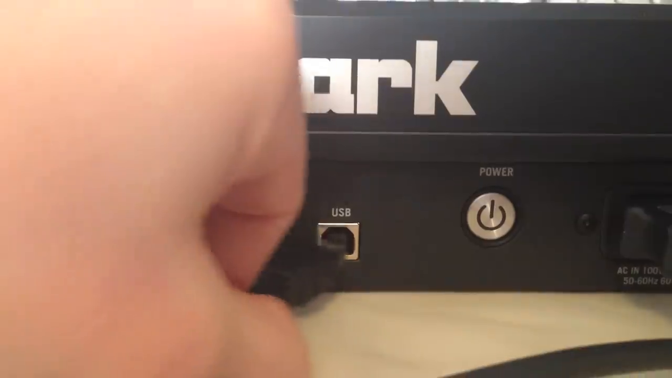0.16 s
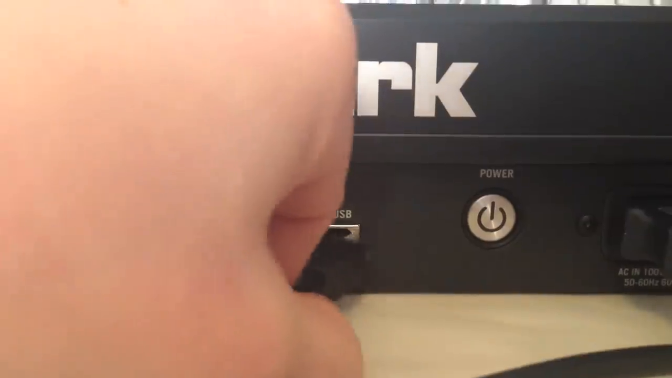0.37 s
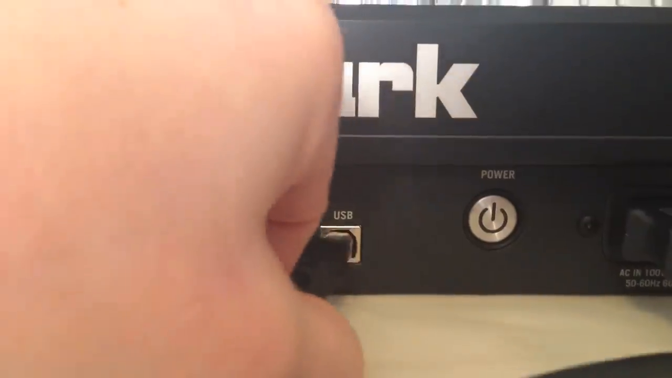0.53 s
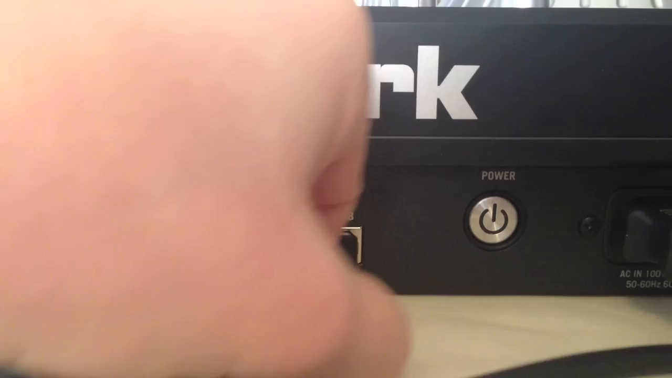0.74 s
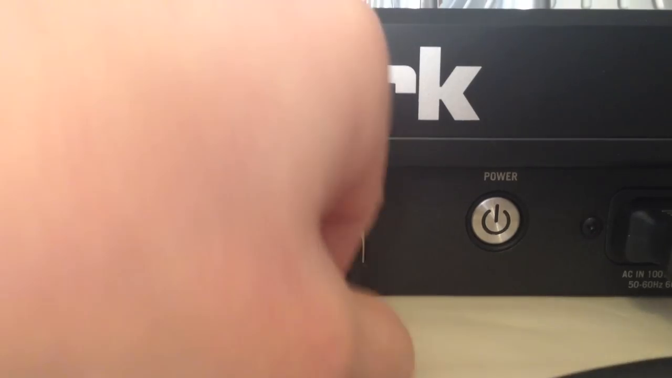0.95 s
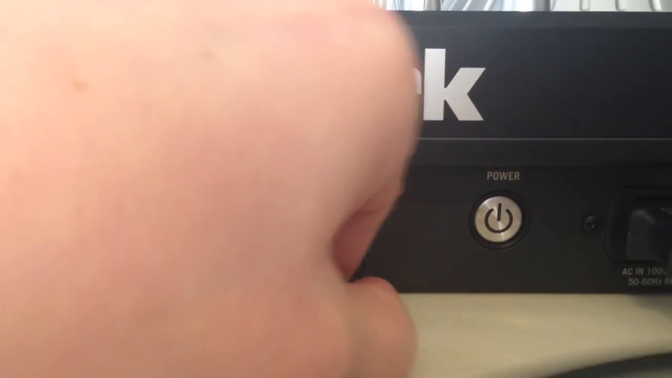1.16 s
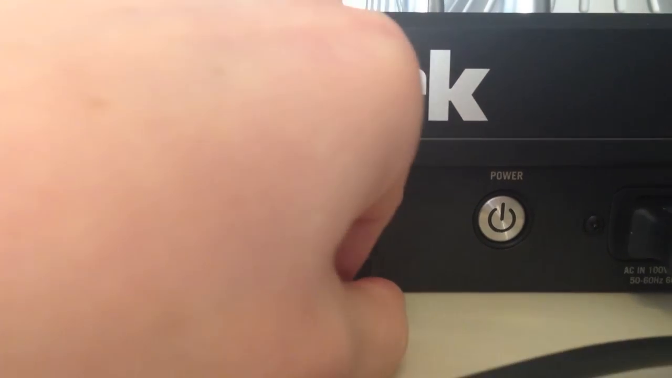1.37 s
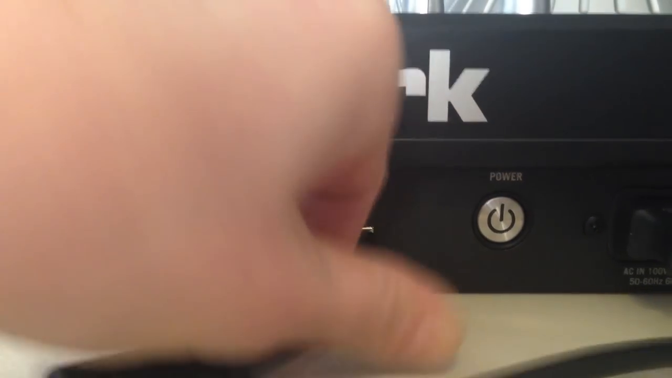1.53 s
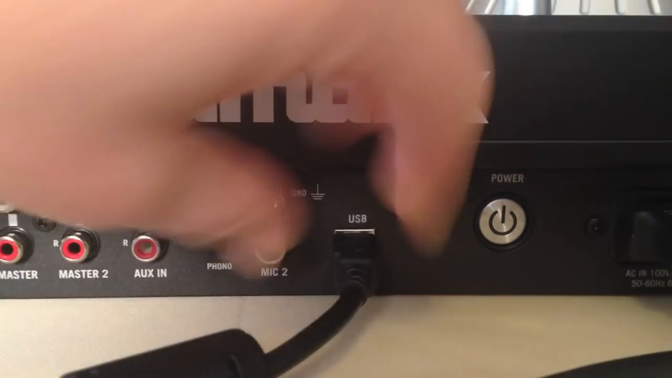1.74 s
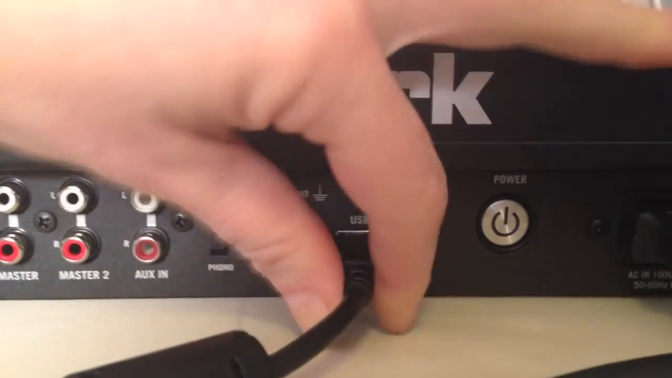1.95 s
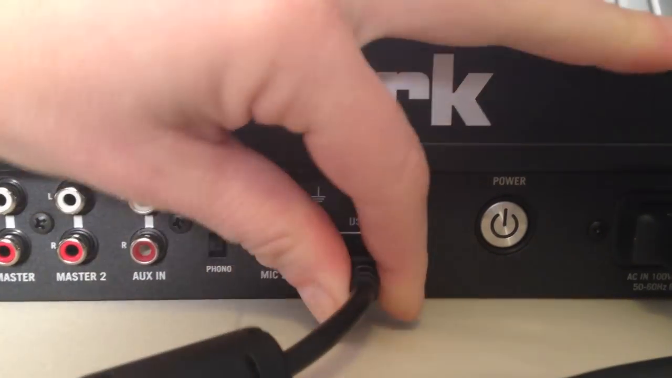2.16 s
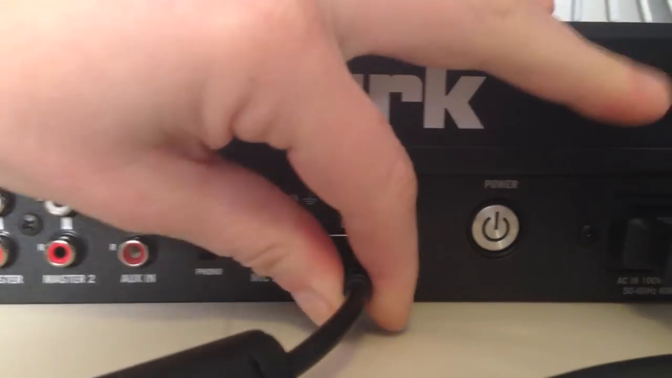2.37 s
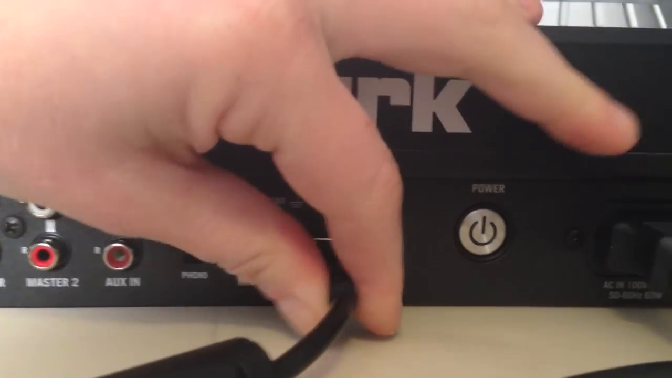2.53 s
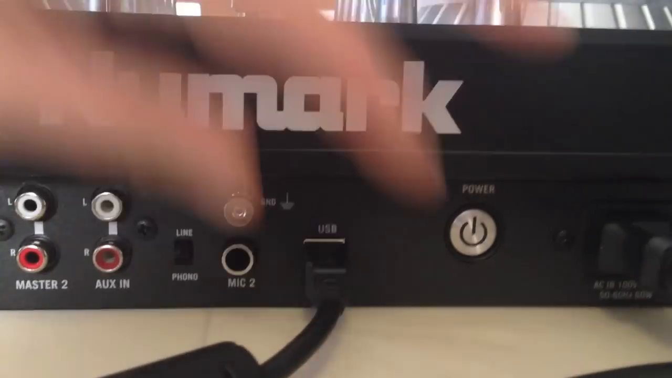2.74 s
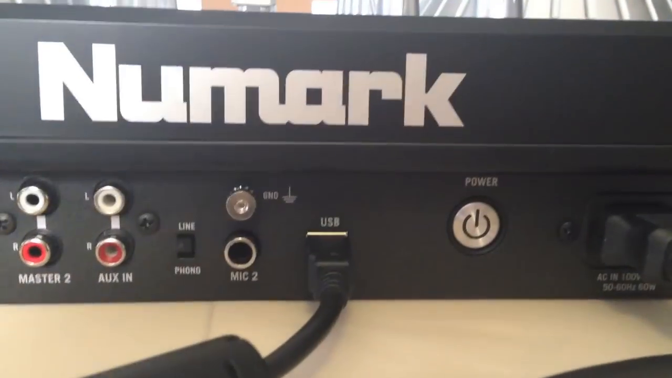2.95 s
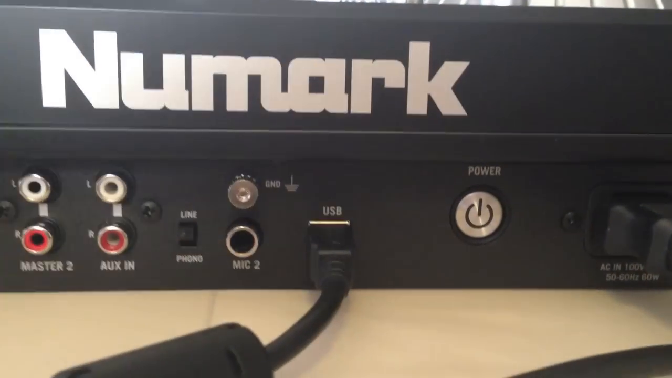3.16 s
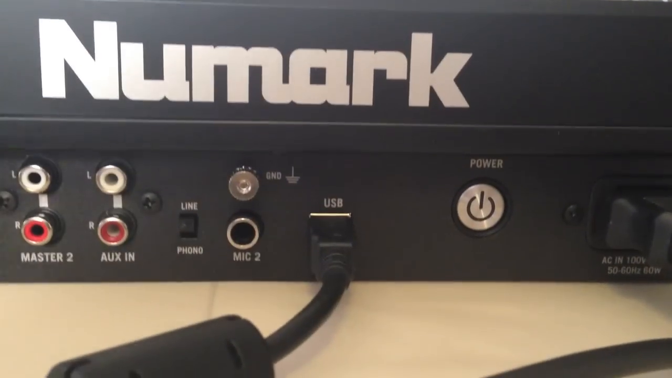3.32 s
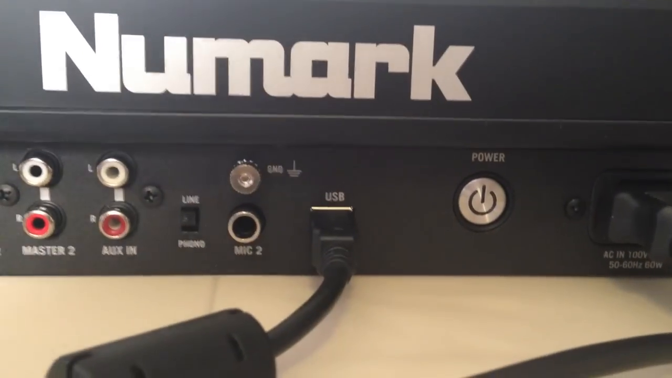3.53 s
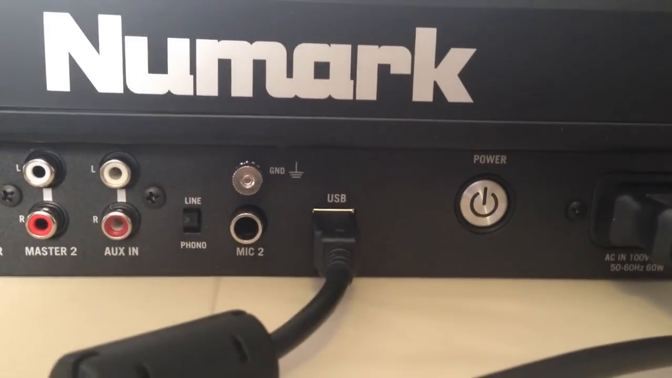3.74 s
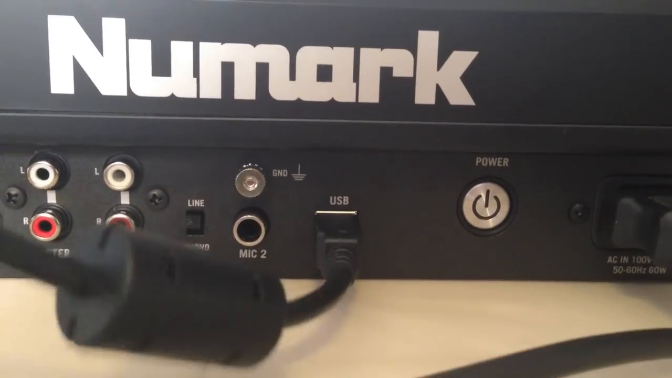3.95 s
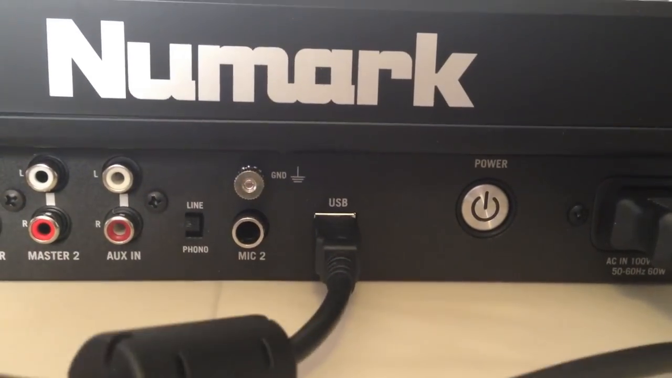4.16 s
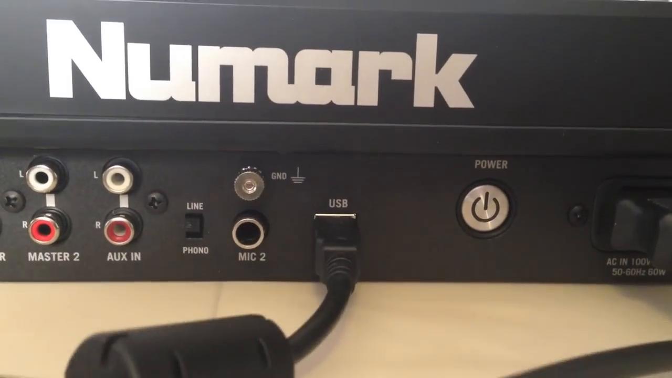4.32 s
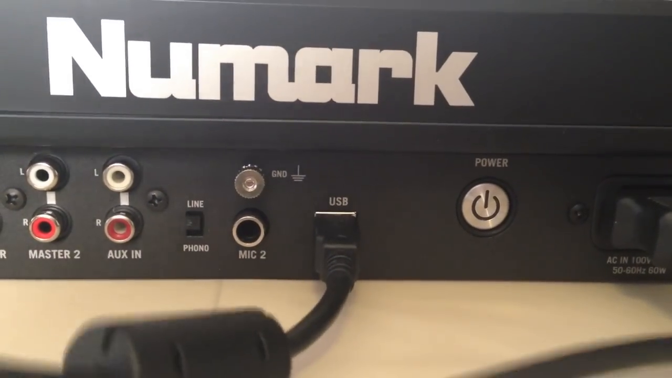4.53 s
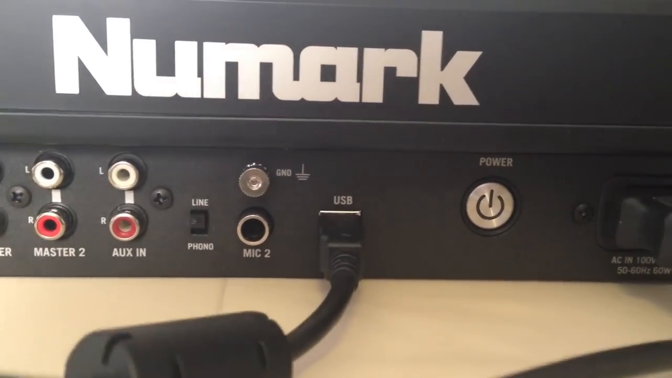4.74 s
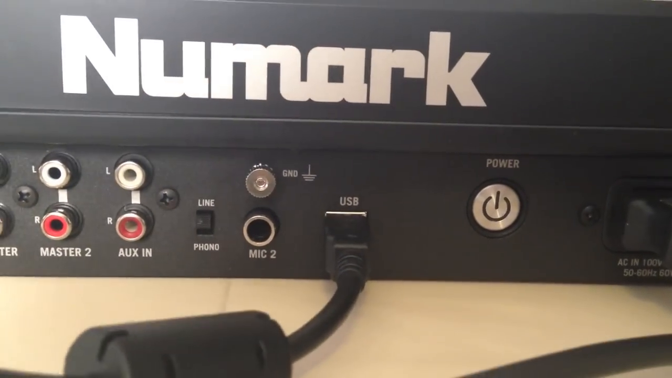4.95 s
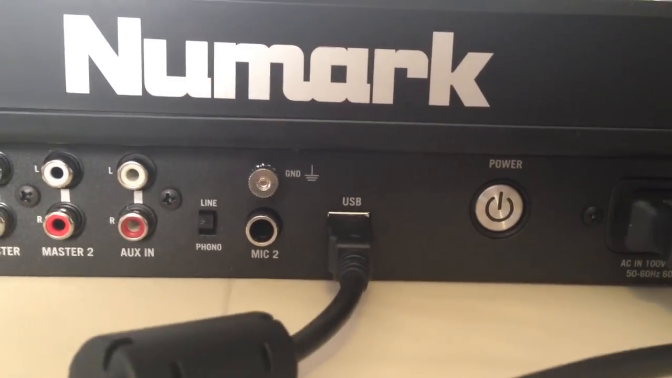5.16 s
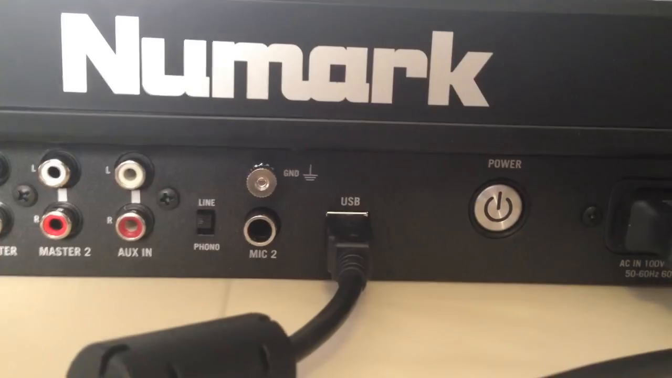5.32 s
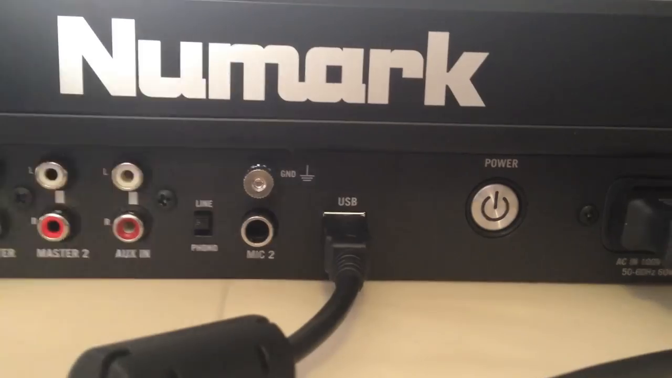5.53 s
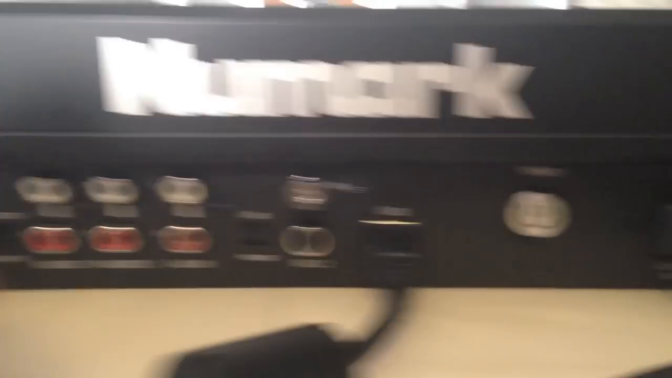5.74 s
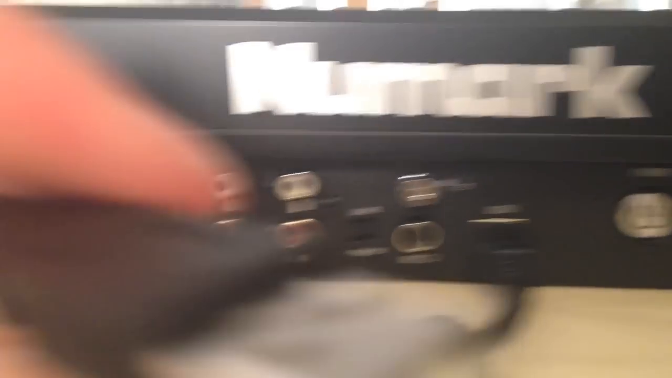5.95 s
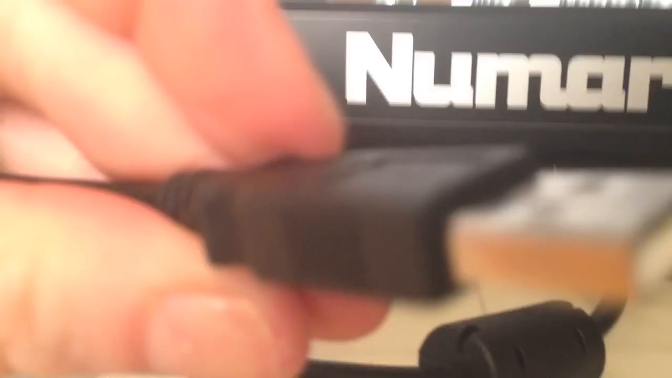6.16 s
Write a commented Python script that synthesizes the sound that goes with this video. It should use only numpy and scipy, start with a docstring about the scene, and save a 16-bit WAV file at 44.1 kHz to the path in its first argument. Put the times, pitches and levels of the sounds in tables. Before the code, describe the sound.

A plastic and metal plug is fumbled against a socket, knocks in, snaps home with a second push, then its cable is set down.

```python
"""In a small quiet room a USB plug is fumbled against its socket on the back of a desktop mixer.
It slides in and seats with a knock; a second push snaps it home, and the cable is dragged and set down.
Force pulses and friction noise excite resonant modes of case and plug, heard from close by.
Squeaks ring single modes; diffuse echoes and a steady room tone surround the contacts."""
import sys
import numpy as np
from scipy import signal
from scipy.fft import rfft, irfft, next_fast_len
from scipy.io import wavfile

SR = 44100
rng = np.random.default_rng(int(sys.argv[2]) if len(sys.argv) > 2 else 0)


def log_audio(samples):
    """Write samples as a 16-bit WAV file to the path given in sys.argv[1]."""
    # one column per channel
    frames = np.atleast_2d(samples).T
    # limit to full scale, then quantise
    limited = np.clip(frames, -1, 1)
    pcm = np.round(limited * 32767).astype(np.int16)
    wavfile.write(sys.argv[1], SR, pcm)


N = 277290

SQUARE_HIT_SCUFF = 0.13   # share of skidding (0-1) in thuds, knock and snap, which hit squarely


def from_db(db):
    """Level definition: an amplitude gain is 10 to the power of dB / 20."""
    return 10 ** (np.asarray(db) / 20)


def at_hz(hz, known_hz, values):
    """Logarithmic frequency scale: read a spectrum between its known points."""
    return np.interp(np.log(np.maximum(hz, 1)), np.log(known_hz), values)


def coloured(x, known_hz, db):
    """Linear filtering: multiply the spectrum of a noise by a smooth gain curve."""
    size = next_fast_len(len(x))
    hz = np.fft.rfftfreq(size, 1 / SR)
    gain = from_db(at_hz(hz, known_hz, db))
    return irfft(rfft(x, size) * gain, size)[:len(x)]


def tilted(db, known_hz, pivot_hz, brightness):
    """Contact stiffness: harder surfaces tip a spectrum to the treble, in dB per octave about a pivot."""
    octaves = np.log2(np.asarray(known_hz) / pivot_hz)
    return np.asarray(db) + brightness * octaves


def add(track, s, sound):
    """Superposition: mix a sound into a track at time s."""
    start = max(round(s * SR), 0)
    track[start:start + len(sound)] += sound[:max(len(track) - start, 0)]


def resonance(x, hz, width):
    """Damped oscillator: one mode of given bandwidth in Hz, with gain 1 at its peak."""
    r = np.exp(-np.pi * width / SR)
    poles = [1, -2 * r * np.cos(2 * np.pi * hz / SR), r * r]
    return (1 - r * r) / 2 * signal.lfilter([1, 0, -1], poles, x)


def room_tone():
    """Stationary noise: steady room tone and microphone hiss, shaped by a fixed spectrum."""
    # spectral density of the background: hz, relative_level_db (per Hz)
    floor_spectrum = [(15, -54.5), (25, -34.5), (43, -14), (75, -10.5), (98, -8), (131, -9), (172, -6.5),
                      (207, -10), (373, -14.5), (588, -22.5), (673, -22.5), (1000, -25.5), (1580, -33),
                      (3830, -28.5), (15000, -31.5)]
    floor_db = -63.5   # rms level
    tone = coloured(rng.standard_normal(N), *np.transpose(floor_spectrum))
    return from_db(floor_db) * tone / tone.std()


def handling():
    """Power subtraction: only what exceeds the still level is the dull, restless pressure of the hands."""
    # rumble of the moving hands: time_s, relative_level_db (still level included)
    hand_levels = [(0.0, -68.5), (0.19, -57), (0.38, -58), (0.51, -61.5), (0.82, -64), (1.72, -56),
                   (2.08, -62), (2.57, -55.5), (2.8, -66.5), (3.52, -68), (4.22, -64), (4.38, -58),
                   (5.31, -64.5), (6.29, -66)]
    # its spectrum: hz, relative_level_db
    hand_colour = [(80, -4), (160, 0), (350, -0.5), (700, -11.5), (1500, -18), (4000, -23), (10000, -34)]
    still_db, gain_db = -68, 12.5
    level_db = np.interp(np.arange(N) / SR, *np.transpose(hand_levels))
    excess_power = from_db(level_db) ** 2 - from_db(still_db) ** 2
    pressure = np.sqrt(np.maximum(excess_power, 0))
    rumble = coloured(rng.standard_normal(N), *np.transpose(hand_colour))
    return from_db(gain_db) * pressure * rumble


def swell(half_s, roundness=1.7):
    """Speed-dependent friction: one second of loudness as a stroke quickens to its middle and stops."""
    t = np.arange(SR) / SR - .5
    return np.exp(-np.abs(t / half_s) ** roundness)


def slips(per_s=2200, spread_db=4.5, smooth=0.91):
    """Random slip: one second of tiny uneven slips over a smooth hiss, about rms 1."""
    excess_db = spread_db * np.minimum(rng.exponential(1, SR), 4)
    sizes = from_db(excess_db) * rng.choice([-1, 1], SR)
    grains = sizes * (rng.random(SR) < per_s / SR)
    hiss = smooth * rng.standard_normal(SR)
    return (grains / grains.std() + hiss) / np.hypot(1, smooth)


def friction():
    """Sliding friction: strokes of plug, fingers and cable are random slips, brighter on harder surfaces."""
    # sliding strokes: peak_s, half_length_s, relative_level_db, brightness_db_per_octave
    strokes = [(0.199, 0.054, -55, -4.5), (0.415, 0.013, -48.5, 6), (0.508, 0.015, -40.5, -1),
               (.713, .015, -44.5, -1.5), (1.11, 0.02, -47, -0.5), (1.205, 0.048, -51, -0.5),
               (1.277, 0.029, -46, 2), (1.568, .03, -42, 4), (1.596, .014, -30.5, 3),
               (1.839, 0.01, -48.5, 10), (1.99, 0.013, -51.5, 2), (2.126, .007, -53.5, 0),
               (2.27, 0.006, -51, -3), (2.704, 0.024, -49, 1.5), (3.953, .045, -56, 0),
               (4.29, 0.04, -44.5, -3), (4.464, 0.043, -32.5, -1), (4.498, 0.015, -36, -2),
               (4.689, 0.13, -56, -0.5), (4.916, 0.055, -52, .5), (5.322, 0.019, -59, -9.5),
               (5.54, 0.089, -59, -.5), (5.891, 0.11, -55, 4)]
    # points of the friction spectrum: hz
    stroke_hz = [800, 2400, 4700, 9500]
    # friction force at those points: relative_level_db
    stroke_force, pivot_hz = [-0.5, -3.5, -10, -25.5], 2430
    out = np.zeros(N + SR)
    for s, half_s, db, brightness in strokes:
        colour_db = db + tilted(stroke_force, stroke_hz, pivot_hz, brightness)
        stroke = coloured(slips(), stroke_hz, colour_db) * swell(half_s)
        add(out, s, stroke)
    return out[SR // 2:][:N]   # each stroke peaks half a second into its sound


def force_pulse(known_hz, db, size=2048):
    """Minimum phase: the most sudden causal push with this spectrum, broad if soft and narrow if hard."""
    hz = np.fft.rfftfreq(size, 1 / SR)
    cepstrum = irfft(np.log(from_db(at_hz(hz, known_hz, db))))
    # fold the cepstrum onto positive times
    causal = 1 + np.sign(size / 2 - np.arange(size))
    causal[0] = 1
    return irfft(np.exp(rfft(cepstrum * causal)))


def click_pulse(db, brightness, favoured_hz):
    """Point mobility: a tilted hard-contact spectrum with a hump where the struck spot answers best."""
    # points of the hard-contact spectrum: hz
    contact_hz = [170, 420, 1000, 2200, 4500, 9500]
    # contact force at those points: relative_level_db
    click_force, pivot_hz = [-4.5, 2.5, -2, -1.5, -11, -32], 1540
    favour_db, favour_octaves = 8.5, .38   # height and half width of the hump
    hz = np.geomspace(100, 16000, 80)
    base = at_hz(hz, contact_hz, tilted(click_force, contact_hz, pivot_hz, brightness))
    hump = favour_db * np.exp(-(np.log2(hz / favoured_hz) / favour_octaves) ** 2)
    return force_pulse(hz, db + base + hump)


def clicks():
    """Hard impact: plastic and metal touch; firm clicks land cleanly, light ones mostly skid."""
    # taps: time_s, relative_level_db, brightness_db_per_octave, favoured_hz
    click_table = [(.23, -12.5, -2, 2020), (0.447, 1, -.5, 308), (.546, 1, 3, 2040), (.549, 2.5, 3.5, 4470),
                   (.5505, -3.5, 1.5, 2050), (0.744, -24, -1.5, 2100), (1.654, -2, -2, 2200),
                   (2.185, -18.5, 6.5, 2650), (2.273, -14, -4.5, 400), (2.3868, 0.5, 3.5, 2500),
                   (2.6826, -23.5, 0.5, 2600), (2.723, -24, -1, 2200), (3.7508, -26.5, -3, 2400),
                   (3.859, -27.5, -4.5, 2200), (4.2261, -11.5, -4.5, 1340), (4.5172, -10.5, -1, 2440),
                   (4.7913, -15.5, -2, 960), (4.8386, -17, -5, 756), (4.852, -18.5, -3.5, 745),
                   (4.871, -12, 3, 2360), (5.148, -28.5, -1.5, 1600), (5.275, -20.5, -2.5, 1394),
                   (5.396, -29, 0, 2000)]
    room_db, clean_hit_db = -11, 0
    out = []
    for s, db, brightness, favoured_hz in click_table:
        scuff = 1 / (1 + from_db(db - clean_hit_db))
        out.append((s, click_pulse(db, brightness, favoured_hz), room_db, scuff))
    return out


def thuds():
    """Cushioned impact: the softer the bump of hand, plug or cable, the lower its force rolls off."""
    # bumps: time_s, relative_level_db, rolloff_hz
    thud_table = [(1.035, 15, 193), (1.243, 11.5, 339), (1.354, 6.5, 310), (1.654, 14, 230),
                  (2.4028, 13, 379), (2.621, -2.5, 343), (2.6828, 4.5, 300), (2.704, 4.5, 294),
                  (3.738, -10.5, 560), (4.212, 6, 196), (4.286, 2, 363), (4.52, 5, 326), (4.7446, -4, 248),
                  (4.971, 11, 426)]
    # common force spectrum: multiple_of_rolloff, relative_level_db
    thud_force = [(.3, -0.5), (1, -1), (2.5, -29), (7, -38), (24, -60)]
    room_db = -13
    multiples, thud_db = np.transpose(thud_force)
    out = []
    for s, db, rolloff_hz in thud_table:
        pulse = force_pulse(rolloff_hz * multiples, db + thud_db)
        out.append((s, pulse, room_db, SQUARE_HIT_SCUFF))
    return out


def knock():
    """Sudden stop: the plug bottoms out in a square hit, strongest in the bass."""
    # force spectrum of the stop: hz, relative_level_db
    knock_force = [(170, 28.5), (520, 28.5), (800, 20), (1100, 12), (2200, 9), (4000, 3.5), (6000, -13.5),
                   (9500, -38.5)]
    time_s, room_db = 1.631, -13
    return time_s, force_pulse(*np.transpose(knock_force)), room_db, SQUARE_HIT_SCUFF


def snap():
    """Sudden stop: the plug snaps home in a square hit with more treble than the knock."""
    # force spectrum of the snap: hz, relative_level_db
    snap_force = [(170, 18), (280, 21), (620, 13.5), (1000, 22), (1600, 18.5), (2550, 19), (3250, 7.5),
                  (4700, 15), (7000, 4.5), (14000, -9)]
    time_s, room_db = 2.3895, -14
    return time_s, force_pulse(*np.transpose(snap_force)), room_db, SQUARE_HIT_SCUFF


def contacts(scuff_s=0.0023, glancing_s=0.0048, skid_rise_s=.0012, size=1024):
    """Impact excitation: force of all hits, and that force weighted by what it radiates into the room."""
    near, far = np.zeros(N), np.zeros(N)
    t = np.arange(size) / SR
    for s, force, room_db, scuff in [knock(), snap()] + clicks() + thuds():
        # a glancing contact spends part of its force in a short skid of micro-impacts
        scuff = np.clip(scuff, 0, 1)
        fade = np.exp(-t / (scuff_s + glancing_s * scuff))
        skid = rng.standard_normal(size) * fade * (1 - np.exp(-t / skid_rise_s))
        touch = np.sqrt(scuff) * skid / np.linalg.norm(skid)
        touch[0] = np.sqrt(1 - scuff)
        pulse = signal.fftconvolve(force, touch)
        add(near, s, pulse)
        add(far, s, pulse * from_db(room_db))
    return near, far


def squeaks(width_hz=450):
    """Friction-driven resonance: tiny slips keep one mode of the plug or socket ringing."""
    # dry metal and plastic dragged lightly: peak_s, half_length_s, mode_hz, level_db
    squeak_table = [(0.313, 0.034, 4840, -60), (0.41, 0.014, 4950, -54.5), (.508, .012, 4540, -58),
                    (0.579, 0.057, 2420, -55.5), (1.26, 0.059, 2470, -57.5), (1.563, 0.022, 2790, -53),
                    (2.214, 0.026, 3560, -67), (2.382, 0.0053, 2860, -49.5), (3.796, 0.038, 2430, -65),
                    (3.793, 0.05, 4820, -68.5), (4.68, 0.061, 4100, -67.5)]
    out = np.zeros(N + SR)
    for s, half_s, hz, db in squeak_table:
        song = resonance(slips(), hz, width_hz)
        add(out, s, from_db(db) * song / song.std() * swell(half_s))
    return out[SR // 2:][:N]   # each squeak peaks half a second into its sound


def scatter(x):
    """All-pass diffusion: waves bounce in the panel, smearing each blow without colouring it."""
    for delay, share in [(6, .45), (17, .5)]:   # delay in samples
        gap = np.zeros(delay - 1)
        x = signal.lfilter(np.r_[-share, gap, 1], np.r_[1, gap, -share], x)
    return x


def body(force, dead_db, lowest_hz=132):
    """Modal superposition: parallel modes plus a dead click; the small box radiates little deep bass."""
    # ringing of the case (low) and the plug (high): mode_hz, width_hz, relative_level_db
    modes = [(167, 53, 7), (259, 89, -0.5), (358, 94, 1.5), (470, 60, -0.5), (616, 150, 2), (782, 110, 1),
             (912, 92, 1), (1039, 64, 2), (1198, 73, 3.5), (1378, 91, 1), (1570, 120, 0), (1880, 240, 1.5),
             (2120, 110, 2), (2350, 64, 3.5), (2656, 210, 4), (3155, 260, 1.5), (3610, 420, 1),
             (4125, 300, 2), (4610, 350, -0.5), (5240, 450, 1.5), (6450, 420, 2), (7437, 320, 3),
             (8470, 710, -3), (10475, 1600, 1.5), (12000, 320, 0), (13640, 1223, -1)]
    ringing = sum(from_db(db) * resonance(force, hz, width) for hz, width, db in modes)
    out = from_db(dead_db) * force + ringing
    highpass = signal.butter(3, lowest_hz, "high", fs=SR, output="sos")
    return signal.sosfilt(highpass, scatter(out))


def room(x, build_s=.006, early_db=3, early_s=0.045):
    """Diffuse reverberation: echoes off nearby table and wall are stronger early; treble dies faster."""
    # the room's answer to a click: hz, relative_level_db, t60_s
    room_bands = [(89.3, -8, 0.4), (158, 3, 0.42), (402, 1, .44), (987.8, 1, .47), (2290, -4.5, 0.39),
                  (4820, -8.5, 0.41), (10000, -10.5, 0.36), (16000, -15, .2)]
    t = np.arange(SR * 3 // 4) / SR
    hz = np.fft.rfftfreq(len(t), 1 / SR)
    known_hz, level_db, t60s = np.transpose(room_bands)
    noise, echoes = rfft(rng.standard_normal(len(t))), 0
    build = 1 - np.exp(-(t / build_s) ** 2)
    early = from_db(early_db * np.exp(-t / early_s))
    # each row of the identity matrix selects one overlapping band
    for share, db, t60 in zip(np.eye(len(room_bands)), level_db, t60s):
        fade = np.exp(-np.log(1000) * t / t60) * build * early
        band = irfft(noise * at_hz(hz, known_hz, share), len(t))
        echoes = echoes + from_db(db) * band * fade / np.linalg.norm(fade)
    return signal.fftconvolve(x, echoes)[:N]


def scene(contact_db=-2.0, rub_db=-1, rub_room_db=-11):
    """Source, body and room in series: contacts and rubbing ring the body, then the room, over its tone."""
    near, far = contacts()
    rubbing = from_db(rub_db) * friction() + handling()
    direct = body(from_db(contact_db) * near + rubbing, dead_db=-15) + squeaks()
    # the room hears the case from all sides, so the gaps between its modes fill in
    echoes = room(body(far + from_db(rub_room_db) * rubbing, dead_db=-6.5))
    return (direct + echoes + room_tone())[None]


def record(dry, top=0.86):
    """Saturation and band limiting: the loudest peaks are rounded and the treble above 15.1 kHz is cut."""
    lowpass = signal.ellip(10, .1, 90, 15100, fs=SR, output="sos")
    return signal.sosfilt(lowpass, top * np.tanh(dry / top))


dry = scene()
out = record(dry)
log_audio(out)
```